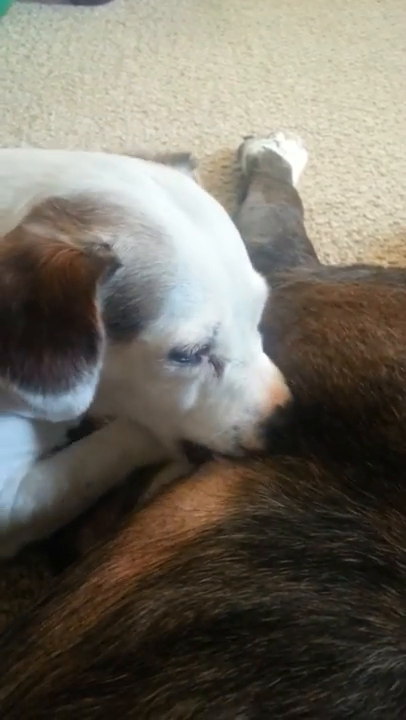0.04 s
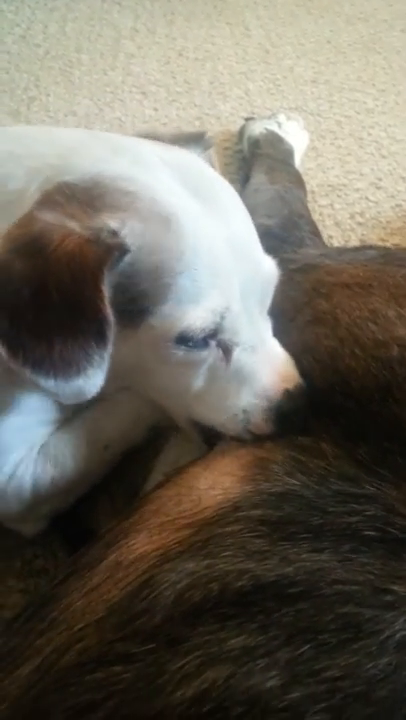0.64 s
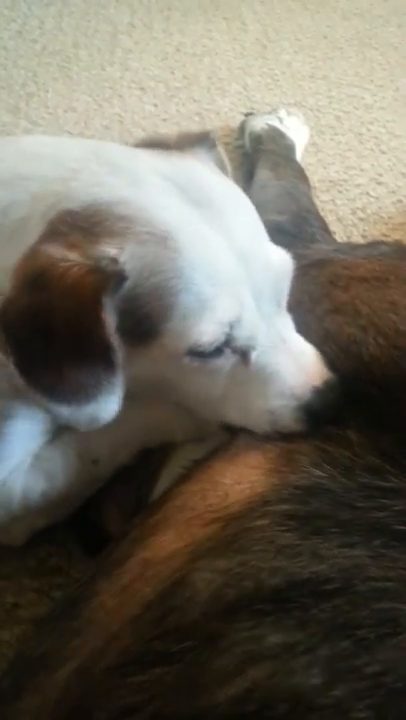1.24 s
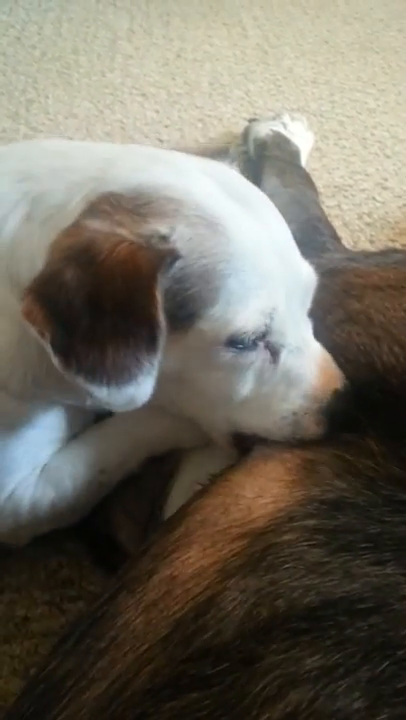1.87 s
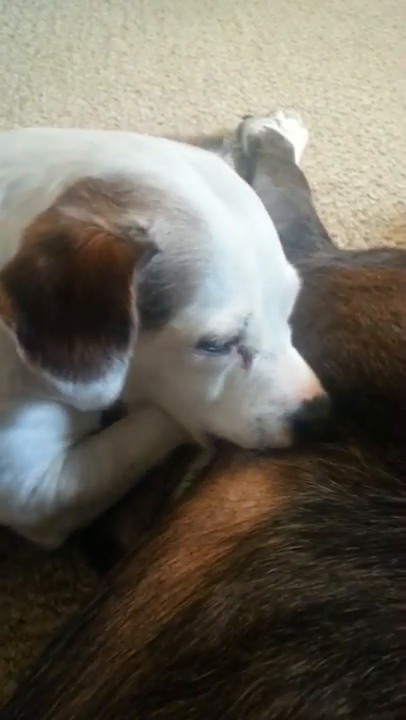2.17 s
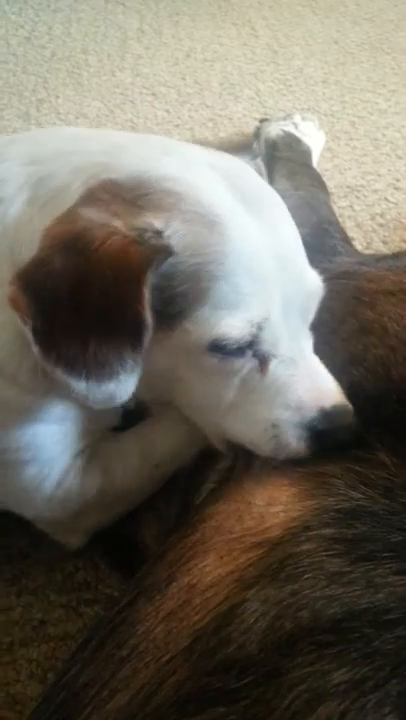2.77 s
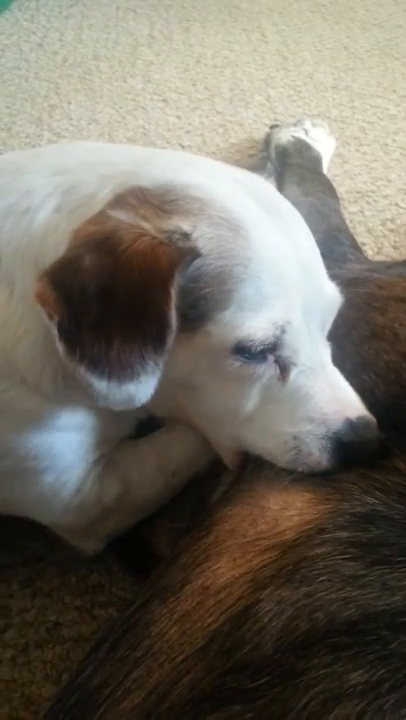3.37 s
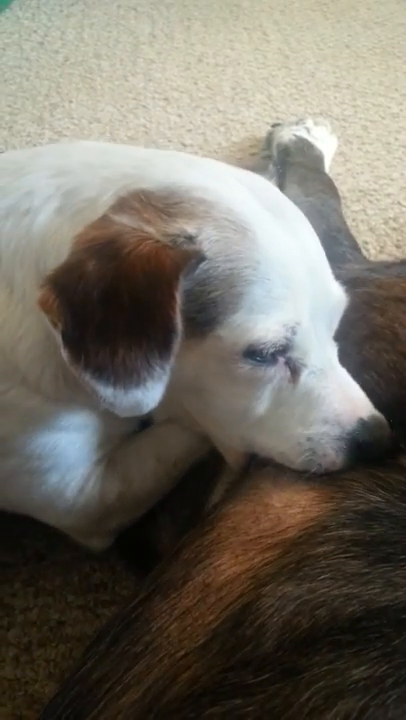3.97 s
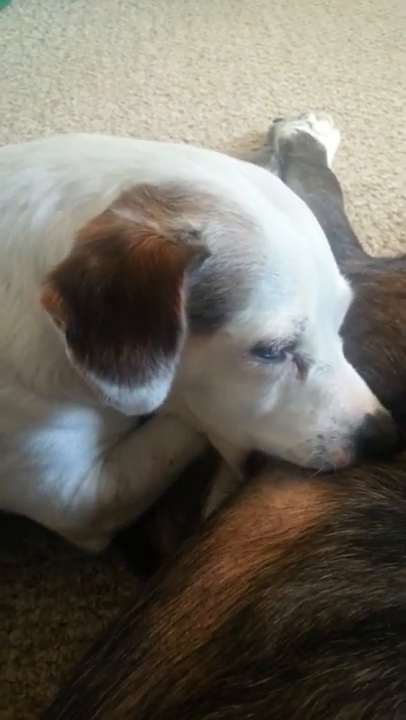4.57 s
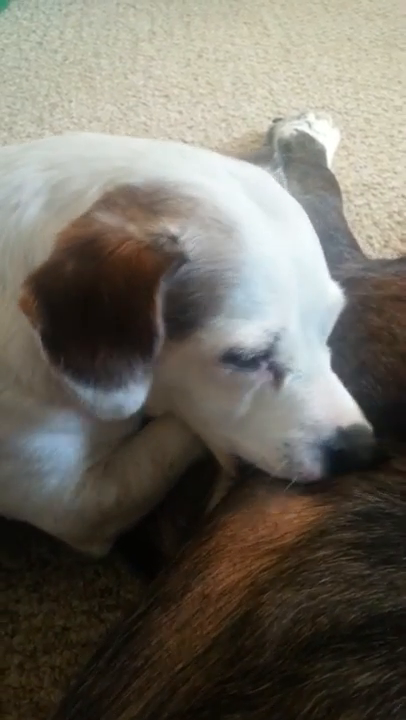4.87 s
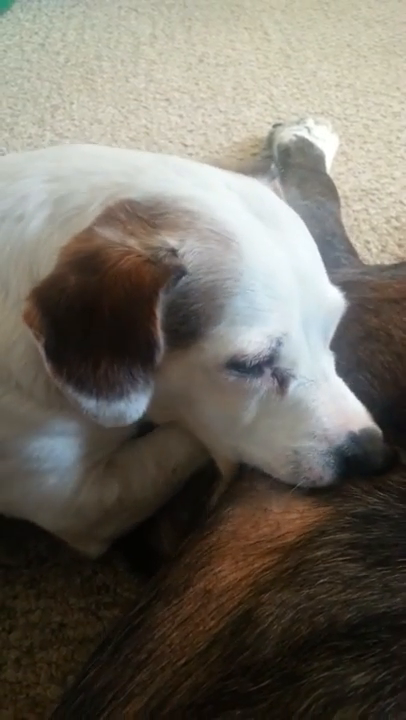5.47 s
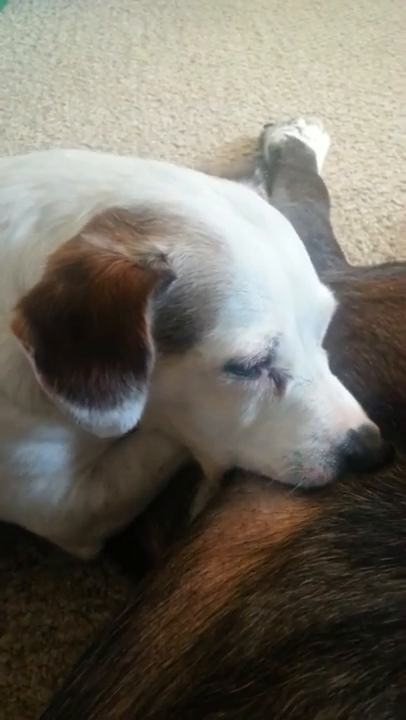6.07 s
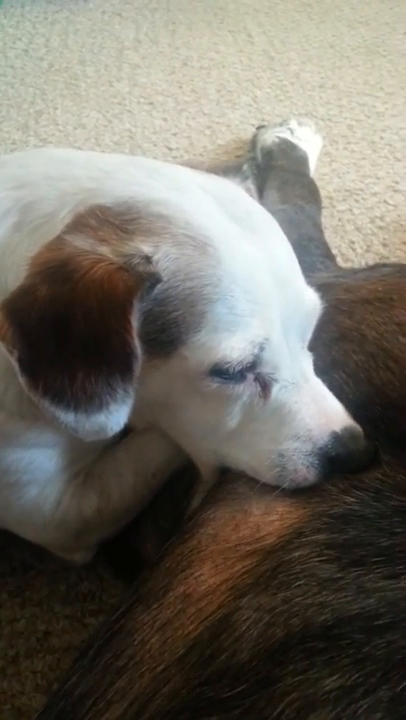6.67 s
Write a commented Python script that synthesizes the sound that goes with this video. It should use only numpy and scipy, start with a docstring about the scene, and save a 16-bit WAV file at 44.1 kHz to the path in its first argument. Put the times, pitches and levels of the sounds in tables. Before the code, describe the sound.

Close, wet little pops and damp fur crackle as a dog suckles, snuffling softly in a quiet, faintly humming room.

```python
"""Small dog suckling on fur

A quiet carpeted room, a phone microphone close to a small dog that suckles on another dog's fur.
Damp hairs crackle with each pull of the jaw, films of saliva snap with a brief, often bright ring,
and the nose snuffles softly. One loud smack and two hollow knocks come early on.
Behind it all lie an uneven low rumble and a faint appliance hum."""
import sys
import numpy as np
from scipy import signal
from scipy.fft import rfft, irfft, next_fast_len
from scipy.io import wavfile
from scipy.ndimage import uniform_filter1d

SR = 44100
rng = np.random.default_rng(int(sys.argv[2]) if len(sys.argv) > 2 else 0)


def waveform_to_disk(signal):
    """Save audio, clipped to [-1, 1], as 16-bit WAV at the path in sys.argv[1]."""
    frames = np.transpose(np.atleast_2d(signal))
    scaled = np.clip(frames, -1, 1) * 32767
    samples = np.round(scaled).astype(np.int16)
    wavfile.write(sys.argv[1], SR, samples)


N = 297234
TIME = np.arange(N) / SR


def undb(db):
    """Decibels to gain."""
    return 10 ** (np.asarray(db) / 20)


def unit(x):
    """Scale to rms 1."""
    return x / np.sqrt(np.mean(x ** 2))


def pan(db):
    """Left and right gains, the left louder by db."""
    return undb(np.array([[db], [-db]]) / 2)


def shape(x, response):
    """Filter by a response given as a function of frequency."""
    size = next_fast_len(x.shape[-1] + 4096)
    hz = np.maximum(np.arange(size // 2 + 1) * SR / size, 1)
    return irfft(rfft(x, size) * response(hz), size)[..., :x.shape[-1]]


def high_pass(x, hz):
    """Steep cut below hz."""
    return signal.sosfilt(signal.butter(4, hz, "highpass", fs=SR, output="sos"), x)


def colour(points):
    """Response through points of frequency_hz, gain_db."""
    hz, db = np.transpose(points)
    return lambda f: undb(np.interp(np.log(f), np.log(hz), db))


def resonance(f, hz, width):
    """Band-pass response, gain 1 at the centre."""
    return 1 / (1 + 1j * (f * f - hz * hz) / (f * width))


def resonances(f, modes):
    """Summed response of modes given as pitch_hz, width_hz, gain_db."""
    return sum(undb(db) * resonance(f, hz, width) for hz, width, db in modes)


def noise(size=N):
    """Two unrelated white noises."""
    return rng.standard_normal((2, size))


def spread(pair, alike_hz):
    """Two unrelated signals to left and right: alike in the bass, wide well above alike_hz."""
    side = shape(pair[1], lambda f: 0.022 + 1.14 * f / np.hypot(f, alike_hz))
    return np.array([pair[0] + side, pair[0] - side])


def wander(hz):
    """Smooth random drift of rms 1, mostly slower than hz."""
    return unit(shape(noise()[0], lambda f: 1 / (1 + (f / hz) ** 4)))


def grains(per_s, scatter_db):
    """Two trains of tiny clicks of uneven size."""
    most = 30000
    places, sizes, signs = rng.random((3, 2, most))[..., :int(min(per_s * N / SR, most))]
    heights = undb(scatter_db * np.minimum(-np.log(1 - sizes), 4)) * np.sign(signs - .5)
    return unit(np.array([np.bincount((p * N).astype(int), h, N) for p, h in zip(places, heights)]))


def swell(start, length, attack_s, release_s):
    """A smooth attack, a hold and an exponential release."""
    t = TIME - start
    attack = np.sin(np.pi / 2 * np.clip(t / attack_s, 0, 1)) ** 2
    return attack * np.exp(-np.maximum(t - length, 0) / release_s)


# Brief swells and dips of the rumble: centre_s, change_db
RUMBLE_SURGES = [(0.06, -9.5), (0.78, 4.5), (0.92, -4.5), (1.14, -17), (1.38, 6), (1.58, -11), (2.05, -10),
                 (2.15, 7), (2.24, -2.5), (2.44, 2.5), (2.75, 8), (2.9, 4.5), (3.09, -4.5), (3.24, 6),
                 (3.46, -5), (3.58, 4.5), (3.842, -21), (3.91, 4), (4.11, 3.5), (4.2, -4.5), (4.31, -8),
                 (4.62, -6.5), (5.0, -19), (5.22, 4.5), (5.38, -12), (6.44, -9.5), (6.67, 8)]
# Tone of the rumble: frequency_hz, gain_db
RUMBLE_SPECTRUM = [(20, -47), (40, -59), (58, -7.5), (92, -16.5), (108, -0.5), (170, -4.5), (230, 2),
                   (345, -6.5), (410, -8.5), (600, -11.5), (900, -20.5), (1400, -29.5), (3000, -41.5)]
# Room modes that the rumble excites: pitch_hz, width_hz, gain_db
ROOM_MODES = [(114.5, 26, -3), (151.1, 5.2, 9), (228, 14, -27.5), (406, 25, 0)]


def rumble(squelch_gain, surge_s=0.024, settle_db_per_s=0.25):
    """A low rumble booms in the room; it wanders, surges, settles slowly and rises with each pull."""
    surges_db = sum(db * np.exp(-((TIME - s) / surge_s) ** 2) for s, db in RUMBLE_SURGES)
    rest_db = -52 + 1.67 * wander(hz=5.9) - settle_db_per_s * (TIME - TIME.mean()) + surges_db
    pull_gain = undb(-1) * uniform_filter1d(squelch_gain, size=SR // 40)
    rough = spread(grains(per_s=250, scatter_db=2.5) + 0.99 * noise(), alike_hz=1090)
    low = shape(rough, colour(RUMBLE_SPECTRUM))
    boom = unit(shape(low, lambda f: 1 + resonances(f, ROOM_MODES)))
    return np.hypot(undb(rest_db), pull_gain) * boom


# Partials of the appliance in the background: pitch_hz, level_db
HUM_PARTIALS = [(59, -79), (119.5, -66.5), (147.5, -66), (240, -72.5), (480, -74.5)]


def appliance_hum(throb_db=2.9, waver_rad=0.39):
    """A faint hum whose partials throb and waver together."""
    waver, throb = waver_rad * wander(hz=4), throb_db * wander(hz=4)
    return sum(undb(db + throb) * np.sqrt(2) * np.sin(2 * np.pi * (hz * TIME + rng.random()) + waver)
               for hz, db in HUM_PARTIALS)


# Room tone: frequency_hz, gain_db
AIR_SPECTRUM = [(100, 27.5), (500, 16.5), (1000, 5.5), (2000, 2.5), (5000, -2), (10000, -3.5), (15000, -6)]


def room_air():
    """The still air of the room, a soft and steady noise."""
    return undb(-61.5) * unit(shape(spread(noise(), alike_hz=620), colour(AIR_SPECTRUM)))


# Pulls of the jaw in the fur: start_s, length_s, hair_db, squelch_db
JAW_PULLS = [(0.025, 0.016, -56, -60), (0.092, 0.029, -58.5, -66), (0.11, 0.17, -52, -59),
             (0.352, 0.12, -50.5, -53), (0.524, 0.044, -54, -62), (0.679, 0.14, -51.5, -60),
             (0.825, 0.069, -55, -71), (1.14, 0.28, -68.5, -63), (1.976, 0.038, -57.5, -53.5),
             (2.084, 0.09, -49, -48.5), (2.241, 0.17, -56.5, -58.5), (2.678, 0.063, -46, -49.5),
             (2.951, 0.066, -50.5, -55), (3.252, 0.049, -54.5, -55), (3.344, 0.049, -50, -55.5),
             (3.499, 0.12, -49.5, -53), (3.855, 0.063, -58, -81), (3.963, 0.034, -50, -62),
             (4.347, 0.13, -49, -62), (4.651, 0.022, -54.5, -53), (4.733, 0.027, -57, -76),
             (4.78, 0.04, -47.5, -51.5), (5.062, 0.076, -52.5, -56), (5.178, 0.022, -55, -58),
             (5.377, 0.12, -55, -54), (5.661, 0.055, -58.5, -58.5), (5.743, 0.083, -51, -63),
             (5.859, 0.045, -59, -56.5), (6, 0.098, -56, -67), (6.146, 0.056, -47.5, -56)]
TIGHTEN_SHARE = 0.47  # part of each pull spent tightening


def jaw(hair_rest_db=-69, squelch_rest_db=-73):
    """Gains of hair and squelch: each pull tightens, holds and lets go; the muzzle is never quite still."""
    hair_power, squelch_power = undb(hair_rest_db) ** 2, undb(squelch_rest_db) ** 2
    tufts = unit(undb(2.5 * wander(hz=73)))  # hairs slip in small tufts
    for start, length, hair_db, squelch_db in JAW_PULLS:
        grip = tufts * swell(start, length, TIGHTEN_SHARE * length, release_s=0.025)
        hair_power += (undb(hair_db) * grip) ** 2
        squelch_power += (undb(squelch_db) * grip) ** 2
    return np.sqrt(hair_power), np.sqrt(squelch_power)


def crackle(pitches_hz, gain, per_s, scatter_db, width_share, rush, firm_db, dull_hz=9500):
    """Grains ring at several pitches over a smooth rush; a light touch gives mostly the rush."""
    rings = sum(shape(grains(per_s, scatter_db), lambda f: resonance(f, hz, width_share * hz))
                for hz in pitches_hz)
    smooth = unit(shape(noise(), lambda f: 1 / np.hypot(1, (f / dull_hz) ** 4)))
    firmness = np.minimum(gain / undb(firm_db), 1)
    return (firmness * unit(rings) + rush * smooth) / np.hypot(firmness, rush)


# Tone of damp hair and of saliva at close range: frequency_hz, gain_db
HAIR_SPECTRUM = [(1000, -7), (2800, -8.5), (4600, -2.5), (6200, -4.5), (7600, -5.5), (9200, -6),
                 (11000, -3), (14500, -10.5)]
SQUELCH_SPECTRUM = [(350, -11.5), (700, 4.5), (1400, 0), (2200, -5.5), (3500, -1.5), (6000, -8)]


def fur(hair_gain, squelch_gain):
    """Damp hairs slip past the lips while saliva squelches at a lower pitch inside the mouth."""
    hair = crackle([3500, 4480, 8000, 10000, 13200], hair_gain,
                   per_s=430, scatter_db=6, width_share=0.19, rush=0.99, firm_db=-57.5)
    squelch = crackle([800, 1400, 2300], squelch_gain,
                      per_s=250, scatter_db=2.5, width_share=0.23, rush=1, firm_db=-45.5)
    hair = unit(shape(spread(hair, alike_hz=7200), colour(HAIR_SPECTRUM)))
    squelch = unit(shape(spread(squelch, alike_hz=1300), colour(SQUELCH_SPECTRUM)))
    return undb(-3.5) * hair_gain * hair + undb(-4) * pan(2) * squelch_gain * squelch


def faint_films(per_pull=2, damping_hz=3200, pan_db=-13):
    """Rows of faint pops: films tear at random once a pull is tight, louder when it is firmer."""
    rows = []
    for start, length, hair_db, _ in JAW_PULLS:
        for when, (size, pitch) in zip(rng.random(per_pull), rng.standard_normal((per_pull, 2))):
            tear_s = start + (TIGHTEN_SHARE + when * (1 - TIGHTEN_SHARE)) * length
            level_db = hair_db + 10.5 + 2 * np.tanh(size)
            rows.append((tear_s, level_db, 7700 + 500 * pitch, damping_hz, pan_db))
    return rows


# Wet pops right by the microphone: start_s, level_db, pitch_hz, damping_hz, pan_db (positive is left)
SALIVA_POPS = [(0.0933, -39, 9450, 3100, -4), (0.149, -34.5, 780, 890, 4), (0.1493, -36.5, 8000, 2000, -5),
               (0.1946, -35, 8000, 2400, -3), (0.2387, -35.5, 1440, 1600, 5), (0.6892, -40, 7350, 1500, -8),
               (0.7232, -38, 7440, 1900, -9), (0.7632, -35.5, 7500, 2000, -8), (1.374, -37, 1800, 2500, 10),
               (1.3851, -36.5, 1430, 1100, 5), (1.389, -35.5, 1470, 900, 5), (1.4509, -29, 5600, 2500, 7),
               (1.453, -16, 9700, 2600, -2), (1.4538, -18.5, 6960, 2500, 9), (1.4545, -23.5, 2460, 800, 10),
               (1.4557, -15, 7600, 3000, -15), (1.4585, -27, 5430, 1500, 3), (1.4562, -15, 5400, 1400, 4),
               (1.4636, -30, 1640, 2500, -3), (1.4674, -27, 920, 1500, 4), (1.719, -27, 6900, 1600, 1),
               (1.7565, -39, 1810, 2500, 2), (2.0576, -38.5, 7600, 1500, -3), (2.101, -37.5, 9800, 3200, 2),
               (2.1242, -32, 3790, 3600, 5), (2.1664, -28, 7200, 1300, -17),
               (2.3057, -32.5, 7600, 4500, -1), (2.3434, -25.5, 7320, 1000, -4),
               (2.3436, -37.5, 1700, 2000, 2), (2.346, -30, 7000, 1200, 12), (2.3922, -36, 8250, 1500, -4),
               (2.4446, -35.5, 6960, 3020, -2), (2.708, -23, 9900, 3200, -1), (2.7106, -33, 7360, 4200, 5),
               (2.7131, -25.5, 4250, 2780, 4), (2.7384, -31, 8750, 4800, 3), (2.9987, -36, 7150, 2400, -3),
               (3.2744, -29, 6600, 1500, 0), (3.387, -33.5, 1390, 1100, 1), (3.4668, -38, 7850, 2800, -8),
               (3.573, -44, 7700, 4500, 7), (3.5925, -30, 7440, 2000, -4), (3.871, -40.5, 7670, 1500, -3),
               (3.9765, -39, 3250, 1700, 1), (3.986, -41.5, 1680, 1510, -2),
               (4.3873, -35.5, 7970, 1700, -9), (4.423, -40, 4840, 1800, 0), (4.4792, -46, 8100, 4900, -4),
               (4.6702, -35, 5850, 1400, 4), (4.7474, -42, 7970, 2300, -12), (4.7946, -42, 8180, 2900, -5),
               (4.8206, -30.5, 1570, 1000, 1.5), (5.0581, -36, 6400, 1400, -1),
               (5.104, -33.5, 10200, 2500, -2), (5.1087, -33.5, 5800, 1400, 4),
               (5.1201, -39, 3100, 1600, 0), (5.1264, -36.5, 7860, 1400, -7),
               (5.2093, -40.5, 7000, 1600, -4), (5.4279, -40.5, 1400, 1800, 2),
               (5.4611, -29, 4480, 2000, 6), (5.463, -25.5, 8150, 2300, -4), (5.4729, -34.5, 1470, 1500, 2),
               (5.4734, -25.5, 4150, 2500, 4), (5.4866, -34, 7700, 1000, -9), (5.768, -34, 10400, 4900, -2),
               (5.7749, -36, 8140, 2500, -7), (5.8925, -36.5, 3120, 1200, 1),
               (5.8927, -28.5, 6700, 1430, 1), (6.0287, -40, 7880, 2100, -11), (6.0708, -39, 7240, 2100, 0),
               (6.185, -29, 1700, 1200, 0), (6.1871, -25, 3260, 2100, 3), (6.1912, -26.5, 2000, 2100, -1)]


def saliva_pops(snap=0.22, rise_s=0.000075, ripple=0.075, ripple_s=0.0064, boost_db=2, repeat_db=-9):
    """Each saliva film snaps with a brief ring of its own pitch, often a bright one, set to its own side."""
    t = np.arange(1024) / SR
    port_delay_s = np.array([[1 / SR], [0]])  # the right port hears the ring first
    out = np.zeros((2, N + len(t)))
    for start_s, db, hz, damping_hz, pan_db in SALIVA_POPS + faint_films():
        fade = np.exp(-1.48 * damping_hz * t) * (1 - np.exp(-t / rise_s))
        ring = np.sin(2 * np.pi * hz * (t - port_delay_s))
        tear = unit(shape(spread(noise(len(t)), alike_hz=16000), lambda f: resonance(f, hz, 0.8 * hz)))
        smaller_films = ripple * tear * np.exp(-t / ripple_s)
        pop = fade / fade.max() * (ring + snap * tear) + smaller_films
        pop = unit(pan(pan_db)) * high_pass(pop, min(0.67 * hz, 3300))  # so small a source has no bass
        gaps_s = rng.uniform(.2, 1, 2) * 0.003  # the pop sounds twice more, ever weaker
        for repeat, lag_s in enumerate(np.cumsum([0, *gaps_s])):
            start = int((start_s + lag_s) * SR)
            out[:, start:start + len(t)] += undb(db + boost_db + repeat * repeat_db) * pop
    return out[:, :N]


# Breaths with the nose in the fur: start_s, length_s, level_db, whistle_start_hz
BREATHS = [(0.33, 0.31, -62.5, 4820), (1.19, 0.37, -69, 4620), (1.688, 0.22, -56, 5070),
           (3.06, 0.16, -64, 4880), (3.349, 0.376, -64.5, 4390), (4.024, 0.12, -73, 3450)]
# Resonances of the nostrils: pitch_hz, width_hz, gain_db
NOSTRIL_MODES = [(3600, 150, -2), (5200, 2700, 3), (7500, 1300, -2.5), (10200, 780, -4)]


def snuffles(whistle_db=-6.5, flutter_hz=550, sag_hz_per_s=1800):
    """Air hisses through the nostrils, with an airy whistle that sinks during each snuffle."""
    hiss = unit(shape(spread(noise(), alike_hz=4400), lambda f: resonances(f, NOSTRIL_MODES)))
    flutter = unit(shape(spread(noise(), flutter_hz), lambda f: 1 / (1 + (f / flutter_hz) ** 2)))
    out = 0
    for start, length, db, hz in BREATHS:
        t = TIME - start
        whistle = np.sqrt(2) * flutter * np.sin(2 * np.pi * (hz - sag_hz_per_s * t / 2) * t)
        breath = swell(start, length, attack_s=0.038, release_s=0.021)
        out += undb(db) * breath * (hiss + undb(whistle_db) * whistle)
    return out


# Resonances of the mouth in the loud smack: pitch_hz, width_hz, gain_db
MOUTH_MODES = [(870, 110, -21.5), (1080, 350, -20.5), (1520, 340, -18.5), (4700, 600, -36),
               (6760, 990, -28.5), (10400, 440, -41.5)]


def smack(start_s=0.9864, echo_db=1, echo_rise_s=0.035, echo_fall_s=0.025):
    """The lips lose their seal once: the whole mouth clucks, and the room answers."""
    t = np.arange(SR // 4) / SR
    ring = sum(undb(db) * np.sin(2 * np.pi * hz * t) * np.exp(-np.pi * width * t)
               for hz, width, db in MOUTH_MODES)
    tone = colour([(60, -7), (300, -3), (520, -26), (700, 0),
                   (1750, -11), (2200, -39), (3000, -33), (4500, 1)])
    cluck = shape(-ring, tone)
    echo_fade = (1 - np.exp(-t / echo_rise_s)) * np.exp(-t / echo_fall_s)
    walls = unit(noise(len(t)) * echo_fade) / np.sqrt(len(t))
    echo = signal.fftconvolve(cluck[None], spread(walls, alike_hz=1900), axes=1)[:, :len(t)]
    start = int(start_s * SR)
    return np.pad(cluck + undb(echo_db) * echo, [(0, 0), (start, N - start - len(t))])


# Contacts, the first two heard as one knock: start_s, level_db, rise_s, fall_s, tilt_db_per_octave
KNOCK_CONTACTS = [(1.6313, -28, 0.0026, 0.02, -0.5), (1.654, -46, 0.0078, 0.092, 4.5),
                  (2.146, -39, 0.0041, 0.021, -4.5)]
# Hollow ring of the knocks: pitch_hz, width_hz, gain_db
HOLLOW_MODES = [(532, 54, 6.5), (815, 45, 9.5), (925, 57, -3), (1040, 71, -8), (1400, 100, -5),
                (1530, 95, -13), (1830, 170, -4), (2260, 77, -14), (2550, 150, -25), (2920, 87, -26),
                (3320, 100, -22)]
# Broad thud under that ring: frequency_hz, gain_db
THUD_SPECTRUM = [(60, -9), (130, 2), (400, -10), (800, -2), (3000, -2), (4000, -11.5), (6000, -9.5),
                 (8000, -12), (10000, -20), (15000, -43)]


def knocks(tilt_above_hz=1000):
    """Short scuffing contacts ring the same hollow modes."""
    t = np.arange(SR // 2) / SR
    thud = colour(THUD_SPECTRUM)
    out = np.zeros((2, N))
    for start_s, db, rise_s, fall_s, tilt_db in KNOCK_CONTACTS:
        def body(f):
            treble = undb(tilt_db * np.log2(np.maximum(f / tilt_above_hz, 1)))
            return treble * (thud(f) + resonances(f, HOLLOW_MODES))

        scuff = spread(noise(len(t)), alike_hz=1400) * (1 - np.exp(-t / rise_s)) * np.exp(-t / fall_s)
        start = int(start_s * SR)
        out[:, start:start + len(t)] += undb(db) * unit(shape(scuff, body)) * np.sqrt(fall_s / t[-1])
    return pan(1) * out


def room_reflections(x, t60_s=0.13, early_s=0.0058, early_db=-11, late_db=-14):
    """Quick reflections off the bodies and floor, then a short, soft tail."""
    t = np.arange(SR // 2) / SR
    onset = 1 - np.exp(-t / 0.0026)
    early, late = (unit(noise(len(t)) * onset * np.exp(-t / decay_s)) / np.sqrt(len(t))
                   for decay_s in (early_s, t60_s / np.log(1000)))
    return signal.fftconvolve(x, undb(early_db) * early + undb(late_db) * late, axes=1)[:, :N]


def microphone_ports(x, ring_hz=7650, width_hz=1200, left_db=-14, right_db=4.5):
    """Sound rings the phone's microphone ports, the right one far more."""
    return shape(x, lambda f: 1 + undb([[left_db], [right_db]]) * resonance(f, ring_hz, width_hz))


def scene():
    """Wet pops, with their bright ring built in, sound over fur, snuffles, knocks and rumble."""
    hair_gain, squelch_gain = jaw()
    pops, bumps = saliva_pops(), knocks()
    diffuse = fur(hair_gain, squelch_gain) + snuffles() + smack() + bumps + room_reflections(pops + bumps)
    background = pan(2.16) * (rumble(squelch_gain) + room_air()) + appliance_hum()
    return pops + microphone_ports(diffuse + background)


def record(dry, bass_cut_hz=47, top_hz=14500):
    """The phone cuts the deep bass and the top."""
    low_pass = signal.ellip(8, .2, 70, top_hz, fs=SR, output="sos")
    return signal.sosfilt(low_pass, high_pass(dry, bass_cut_hz))


dry = scene()
out = record(dry)
waveform_to_disk(out)
```